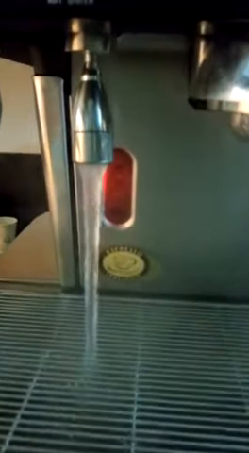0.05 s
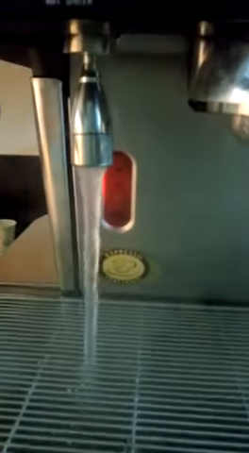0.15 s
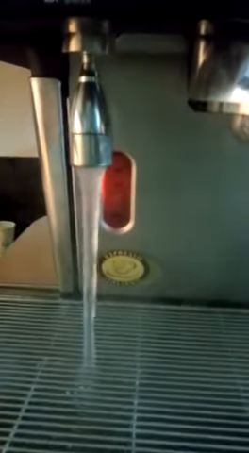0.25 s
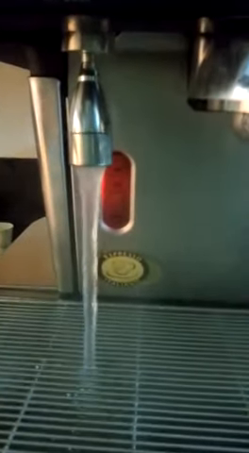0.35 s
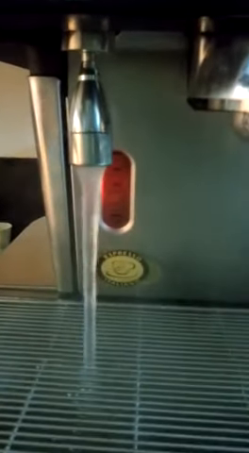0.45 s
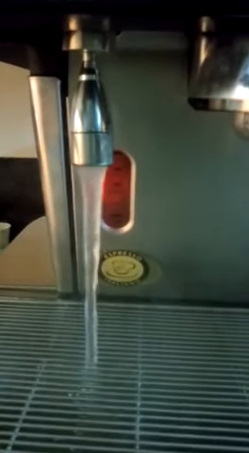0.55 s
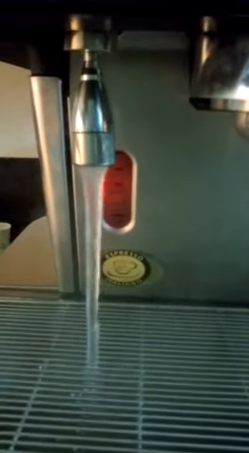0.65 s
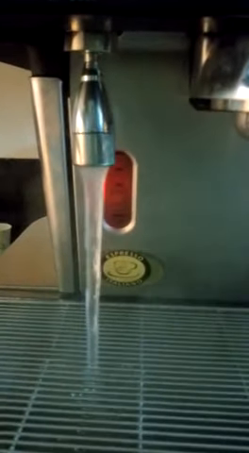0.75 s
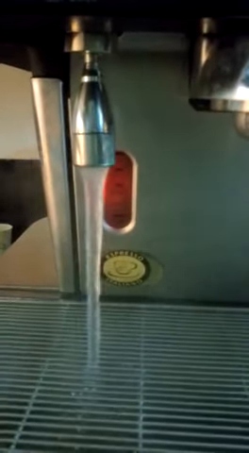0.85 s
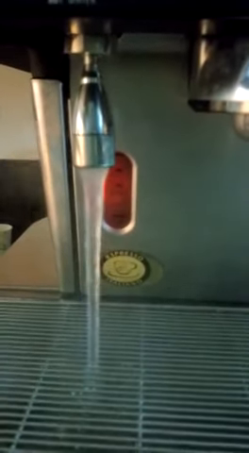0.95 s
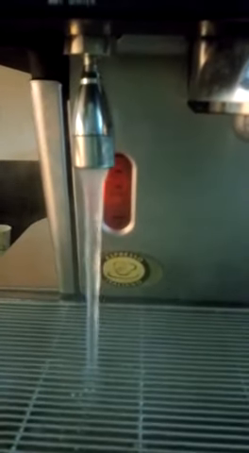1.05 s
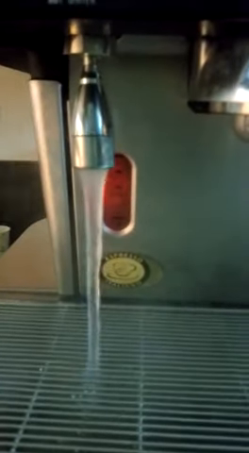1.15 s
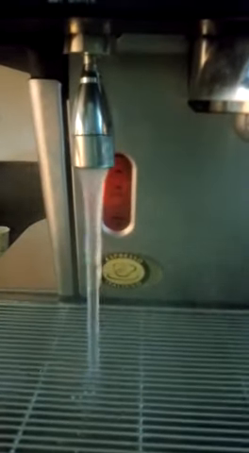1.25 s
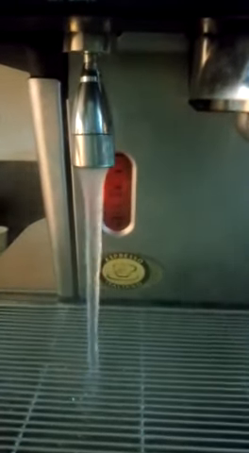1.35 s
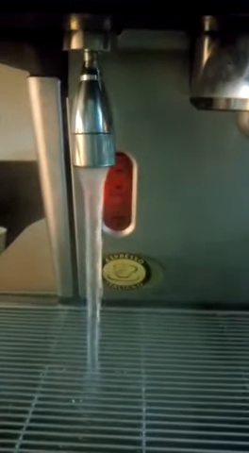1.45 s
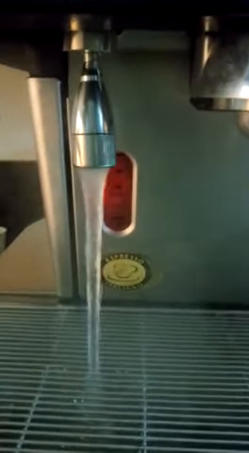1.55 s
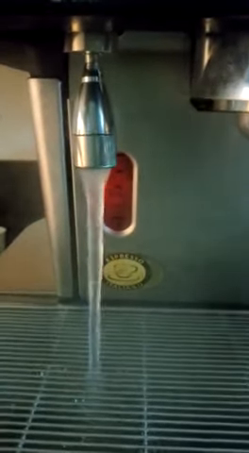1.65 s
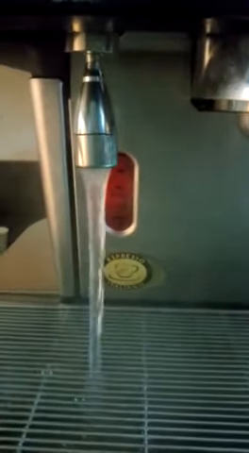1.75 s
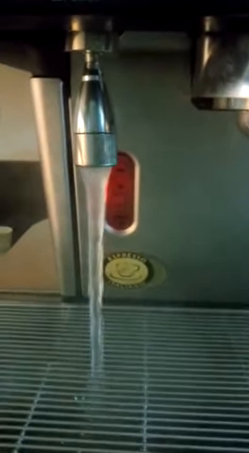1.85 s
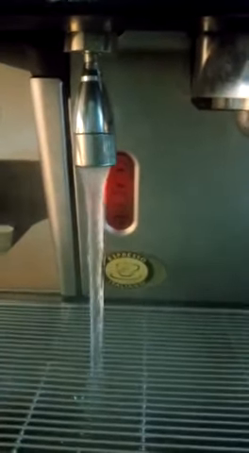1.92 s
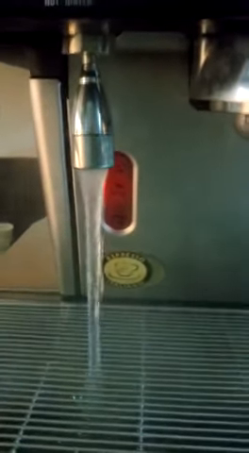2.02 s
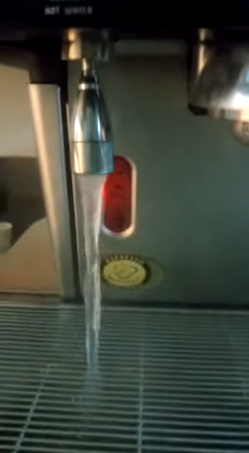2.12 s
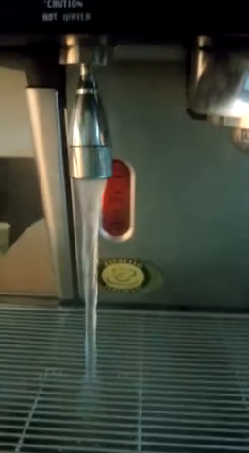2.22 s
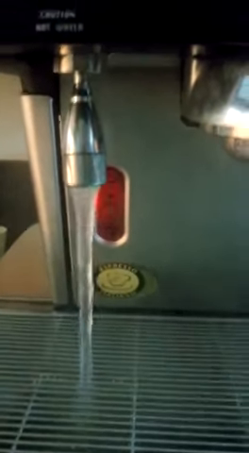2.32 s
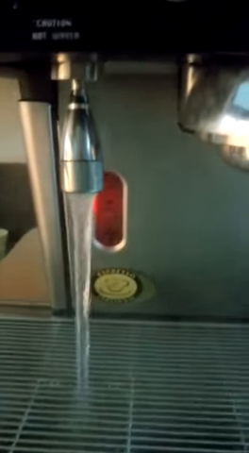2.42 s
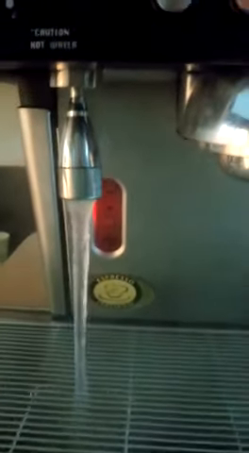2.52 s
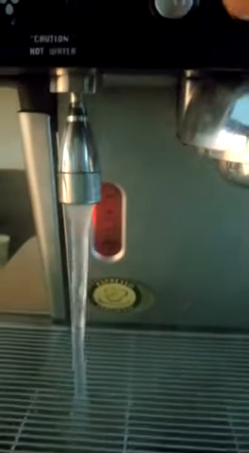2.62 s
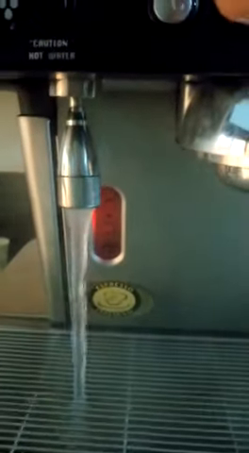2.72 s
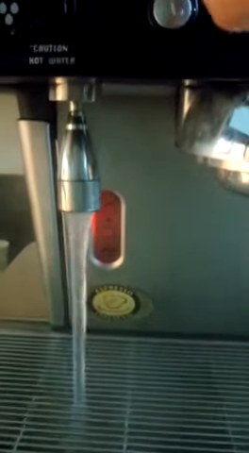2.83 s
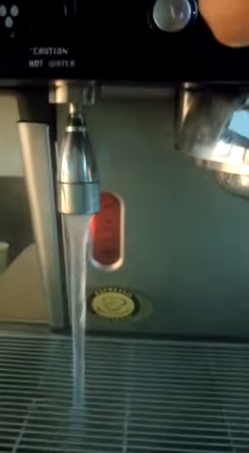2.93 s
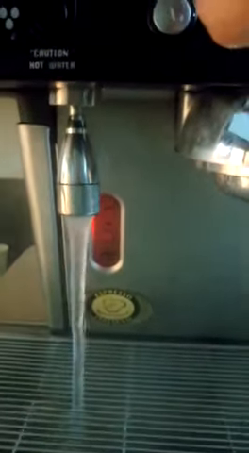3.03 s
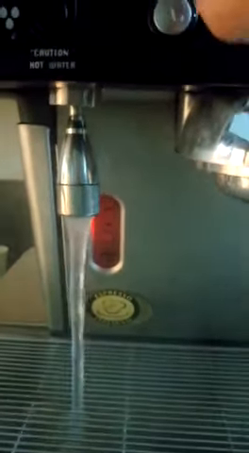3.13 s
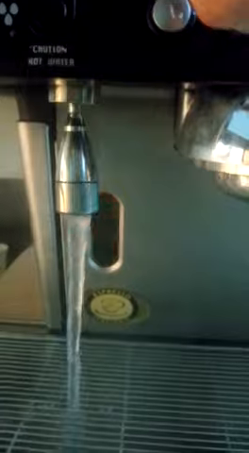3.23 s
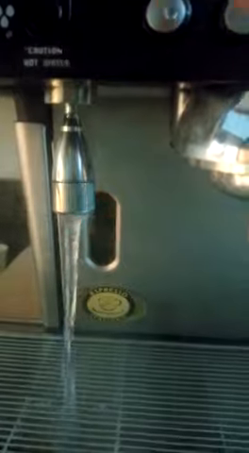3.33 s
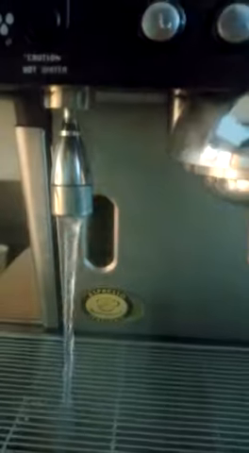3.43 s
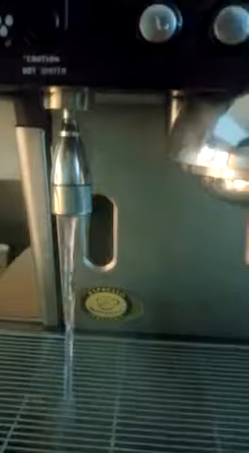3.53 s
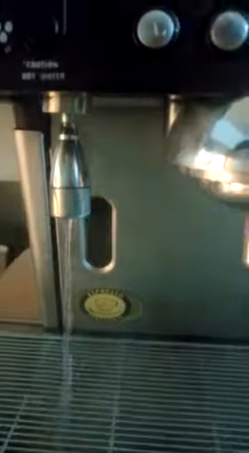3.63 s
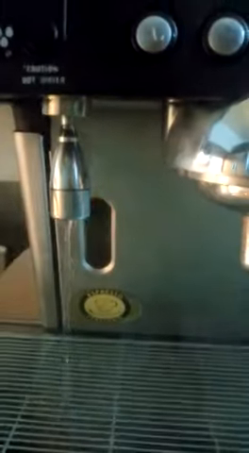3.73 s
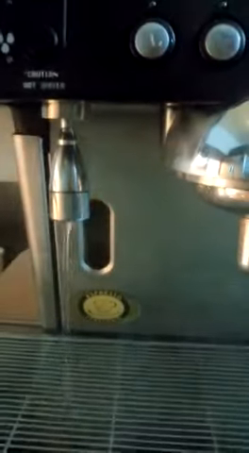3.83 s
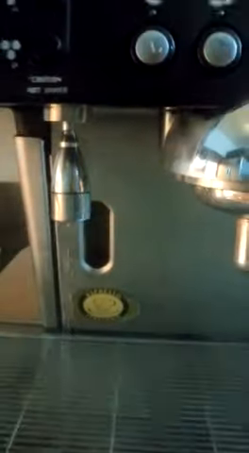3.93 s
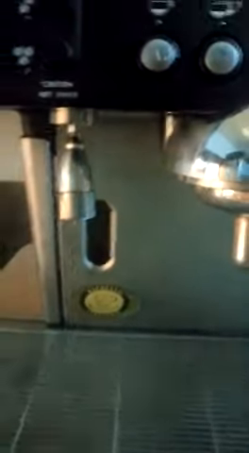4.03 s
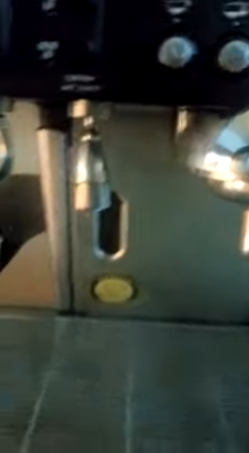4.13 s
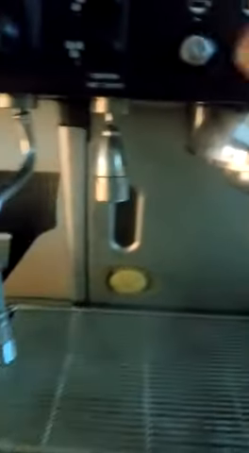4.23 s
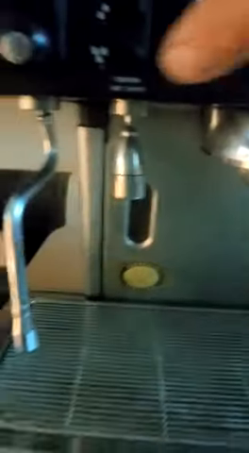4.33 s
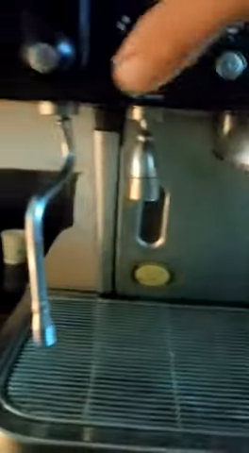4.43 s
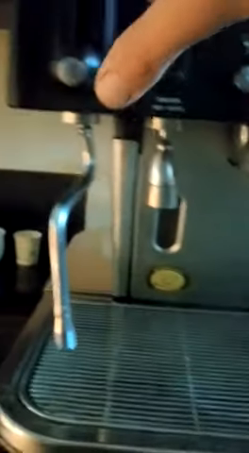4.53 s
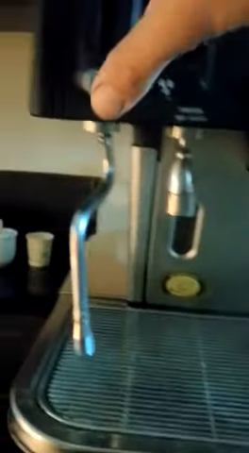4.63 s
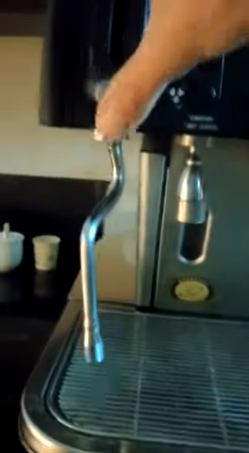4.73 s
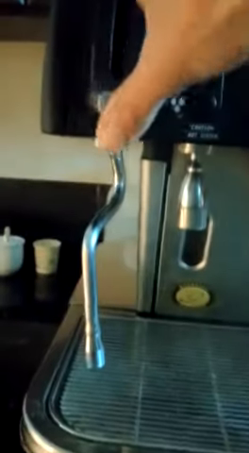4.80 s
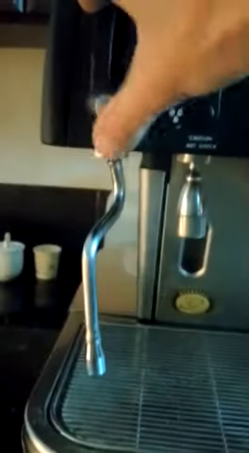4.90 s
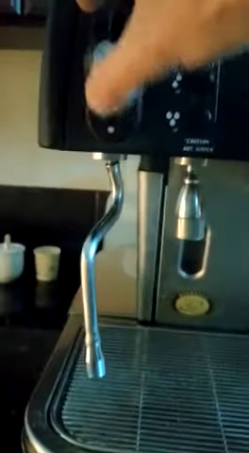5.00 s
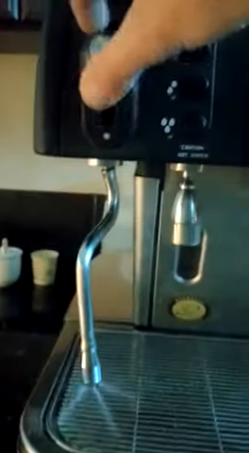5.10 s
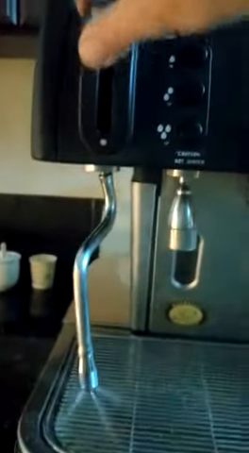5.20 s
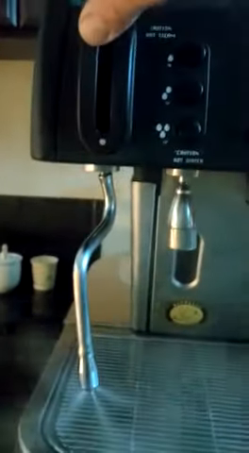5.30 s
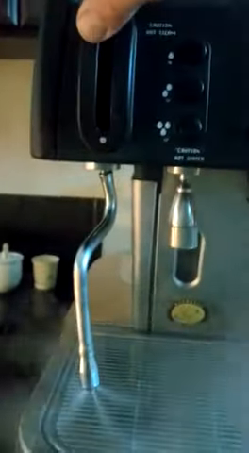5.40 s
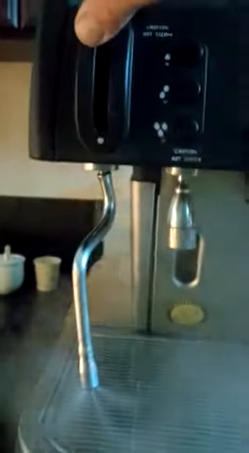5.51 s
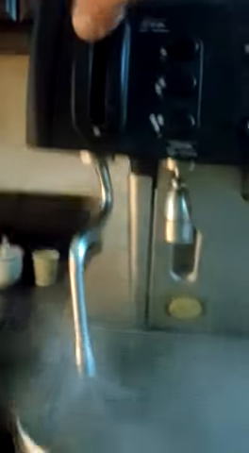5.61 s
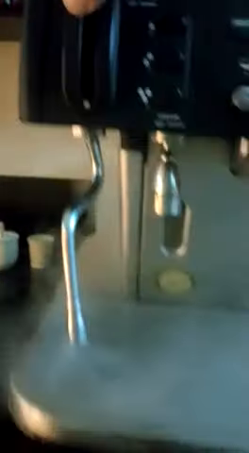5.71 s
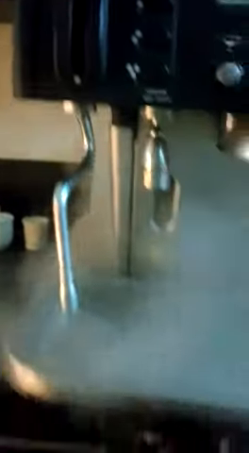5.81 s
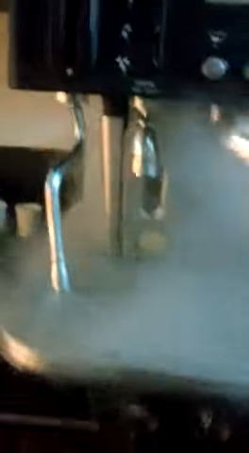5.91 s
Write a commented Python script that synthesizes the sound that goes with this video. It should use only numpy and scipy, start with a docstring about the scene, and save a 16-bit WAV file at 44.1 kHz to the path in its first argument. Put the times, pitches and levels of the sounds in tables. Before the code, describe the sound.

A humming pump and steady hissing pour stop with a pipe thud and gurgle; after a quiet rumble, a steam wand clacks and roars.

```python
"""A kitchen counter with an espresso machine, close to two microphone ports; the right one faces the machine.
The pump hums as harmonics of its turning; hot water, filtered noise and droplets, hisses onto a steel tray.
The valve shuts: damped pipe modes hammer, the flow gurgles away, the last drips fall, a faint regular
ticking fades and the boiler rumbles on. Then the steam valve clacks open; the wand spits condensate and
blows a bright jet of noise onto the tray."""
import sys
import numpy as np
from scipy import signal
from scipy.fft import rfft, irfft, next_fast_len
from scipy.io import wavfile
from scipy.ndimage import uniform_filter1d, map_coordinates

SR = 44100
rng = np.random.default_rng(int(sys.argv[2]) if len(sys.argv) > 2 else 0)


def wrap_up_sound(samples):
    """Save the sound to the file named by the first command line argument, as 16-bit audio."""
    columns = np.atleast_2d(samples).T
    # keep every value between -1 and 1, then stretch to whole-number steps
    tamed = np.clip(columns, -1, 1)
    steps = np.round(tamed * 32767).astype(np.int16)
    wavfile.write(sys.argv[1], SR, steps)


N = 262836

# pouring stream: freq_hz, at_spout_db, drawn_back_db
STREAM_SPECTRUM = [(19.9, -17, -18), (50, -29, -31), (114, -10.5, -9), (250, -0.5, -2), (680, -2.0, -1.5),
                   (1020, -7.0, -8.5), (2120, -3, -2), (3470, -2.5, -4), (4560, 1, 1.5), (5740, 0, -0.5),
                   (6800, -8.5, -8), (9900, -9, -8.5), (15000, -12.5, -11)]
# tray and casing resonances: centre_hz, width_hz, at_spout_db, drawn_back_db
TRAY_MODES = [(190.6, 40, 11, 10), (222, 10, 4.5, 8.5), (311, 32, 7, 4), (454.4, 87, 9, 7), (564, 27, 5, 5),
              (596, 17, 6.5, 3), (800, 45, 3.5, 0.5), (912, 74, 4.5, 7.5), (990, 9.9, 7.5, 7),
              (1357, 24, 2, 6), (1560, 570, 5, 5.5), (1683, 100, 1.5, 3), (2004, 180, 7, 5),
              (2570, 38, 3.5, 3), (2800, 330, 6, 7), (2974, 250, 1.5, 8), (3300, 300, 1, -2.5),
              (3750, 230, 6, 5), (4110, 250, 7.5, -1), (4840, 290, 4, 3), (5020, 400, 0, 2.5),
              (6500, 340, 0.5, 6.5)]
# slack stream after the valve has shut: freq_hz, level_db
TRICKLE_SPECTRUM = [(45, -32), (100, -17), (200, -0.5), (310, -2.5), (430, 1), (750, -5), (1200, -4),
                    (2000, -1.5), (3000, -6.5), (5000, -8), (7000, -16), (15000, -32)]
# steady pour, then draining: time_s, flow_db (relative to the steady pour)
FLOW_CURVE = [(2.8, 0), (3.16, 0.7), (3.24, -2.5), (3.362, -7.5), (3.44, -16), (3.6, -26.5), (4.18, -66)]
HISS_DB, GURGLE_DB = -27.5, -32  # steady pour at the spout, treble and bass
GURGLE_DB_PER_FLOW_DB, GURGLE_BACK_DB = 0.74, 1.5
EMPTY_S, EMPTY_LENGTH_S, EMPTY_DB = 3.6, 0.32, -2.5  # spout runs empty, gurgles less


def hot_water():
    """Water flashes to vapour in the spout and spatters on the tray; losing pressure, it dulls and breaks up."""
    flow_db, = curves(FLOW_CURVE)
    back = drawn_back()
    slack = ramp(3.09, 0.41)
    flow = rng.standard_normal((2, N)) + amp(-7.0) * spatter(rate_hz=3500, spread_db=2)
    unsteady_db = 0.79 * wobble(260) + 1.1 * slack * wobble(70)
    flow = patches(flow * amp(unsteady_db), depth_db=0.77)
    pair = ports(panels(flow, wet_db=-7.5, t60_s=0.17), shade_column=0, lag_ms=0.28)

    near, far = filtered(pair[None], lambda hz: colour(hz, STREAM_SPECTRUM, TRAY_MODES)[:, None])
    pour = unit(near * (1 - back) + far * back)
    trickle = unit(filtered(pair, lambda hz: amp(along(TRICKLE_SPECTRUM, hz))))
    gurgle, hiss = split(pour * (1 - slack) + trickle * slack, edge_hz=960)

    gurgle_db = GURGLE_DB + GURGLE_DB_PER_FLOW_DB * flow_db + GURGLE_BACK_DB * back
    gurgle_db = gurgle_db + EMPTY_DB * ramp(EMPTY_S, EMPTY_LENGTH_S) + 0.2 * wobble(24.8)
    hiss_db = HISS_DB + flow_db + 0.19 * wobble(14.0)
    return amp(gurgle_db) * gurgle + amp(hiss_db) * hiss


# steam jet: freq_hz, level_db
JET_SPECTRUM = [(20, -40), (50, -41), (110, -23), (250, -21.5), (800, -12.5), (2000, -6.5), (4000, -3.5),
                (5500, -2.5), (6400, -1), (7200, -2), (10000, -4.5), (15000, -1)]
# wand and tray resonances: centre_hz, width_hz, level_db
WAND_MODES = [(225, 14, 12.5), (324.5, 16, 9.5), (470, 14, 9.5), (594, 170, 6), (1388, 21, 4),
              (2010, 40, 0), (2800, 450, 4.5), (3170, 80, 2), (4730, 510, 3)]
# rows spit, jet, top hiss: open_wet_db, barely_open_change_db, dry_change_db
STEAM_LEVELS = [(-34.5, -6.5, -8), (-31, -7.5, -2), (-22.5, -11, 2.1)]
# sputters that make the wand sing: centre_s, level_db (before pan), pitch_hz, width_hz, length_s
WAND_SPUTTERS = [(5.128, -44, 1990, 130, 0.02), (5.125, -40, 1400, 370, .02), (5.12, -39, 2900, 500, 0.019),
                 (3.1, -41, 230, 170, 0.025), (5.27, -52, 280, 200, 0.05), (5.33, -33, 1390, 91, 0.014)]
# nozzle whistle, sagging and swelling: time_s, pitch_hz, level_db (before pan)
NOZZLE_WHISTLE = [(5.15, 6500, -50), (5.22, 6416, -38), (5.26, 6300, -29), (5.29, 6180, -35),
                  (5.33, 6420, -32), (5.43, 6370, -39), (5.5, 6130, -28), (5.56, 6360, -40),
                  (5.68, 6280, -36), (5.77, 6400, -33.5), (5.84, 6140, -27), (5.93, 6420, -46)]
STEAM_S = 5.0747  # valve cracks open
OPEN_S, OPEN_LENGTH_S = 5.155, 0.13
DRY_S, DRY_LENGTH_S = 5.317, 0.33
COUGH_S, COUGH_LENGTH_S, COUGH_DB = 5.132, 0.015, 4  # first slug of condensate


def steam():
    """The wand first spits condensate; as it clears, the jet turns dry, smooth and bright."""
    opening, dryness = ramp(OPEN_S, OPEN_LENGTH_S), ramp(DRY_S, DRY_LENGTH_S)
    wetness = 1 - dryness
    flutter_db = 0.3 * wobble(22)
    spit_db, jet_db, top_db = [open_db + shut_db * (1 - opening) + dry_db * dryness + flutter_db
                               for open_db, shut_db, dry_db in STEAM_LEVELS]
    spit_db = spit_db + COUGH_DB * swell(COUGH_S, COUGH_LENGTH_S)

    flow = rng.standard_normal((2, N)) * amp(0.81 * wetness * wobble(220))
    flow = flow + amp(-9.5) * wetness * spatter(rate_hz=1100, spread_db=1)
    flow = patches(flow, depth_db=1.5)
    pair = ports(panels(flow, wet_db=-8.0, t60_s=0.15), shade_column=1, lag_ms=0.1)
    pair = filtered(pair, lambda hz: colour(hz, JET_SPECTRUM, WAND_MODES))
    spit, rest = split(pair, edge_hz=1780)
    jet, top = split(rest, edge_hz=4700)
    blast = amp(spit_db) * spit + amp(jet_db) * jet + amp(top_db) * top

    nozzle_hz, nozzle_db = curves(NOZZLE_WHISTLE)
    whistle = amp(nozzle_db) * murmur(nozzle_hz, width_hz=460) * amp([[-16], [4]])
    sputters = puffs(WAND_SPUTTERS) * amp([[-7], [3]])
    return ramp(STEAM_S, 0.026) * (blast + sputters + whistle)


PUMP_HZ = 98.5
PUMP_DB, PUMP_BACK_DB = -37.5, -1.7  # at the spout before pan; change when drawn back
PUMP_OFF_S, PUMP_FALL_DB_PER_S = 3.2, 300


def pump():
    """The pump turns at a nearly steady speed and shakes the casing until it is switched off."""
    turn = 2 * np.pi * PUMP_HZ * clock() + 0.095 * wobble(8.6)
    hum = np.sin(turn) + amp(-7.5) * np.sin(2 * turn + wobble(10))
    fall_db = PUMP_FALL_DB_PER_S * np.maximum(clock() - PUMP_OFF_S, 0)
    level_db = PUMP_DB + PUMP_BACK_DB * drawn_back() - fall_db + 0.86 * wobble(11.97)
    return amp(level_db) * unit(hum) * amp([[-1.5], [1.3]])


# plunger and seat: pitch_hz, relative_db, t60_s
CLACK_MODES = [(235, -14, .06), (3160, -18, .05), (4960, -11, 0.038), (5280, -1, .025), (5660, -12, .015),
               (6700, -17, .04), (12010, -8, .04), (15600, -4, .025)]


def steam_valve():
    """The valve's plunger clacks open against its steel seat, with a bright snap of released pressure."""
    noise = crack(STEAM_S, t60_s=0.051)
    snap = amp(7.5) * band(noise, centre_hz=5370, width_hz=750)
    snap = snap + amp(-1) * band(noise, centre_hz=7540, width_hz=2200)
    snap = snap + amp(4) * band(noise, centre_hz=12300, width_hz=3700)
    attack = ramp(STEAM_S, 0.0004)
    clack = panels((strike(STEAM_S, CLACK_MODES) + snap) * attack, wet_db=-13, t60_s=0.07)
    return amp(-19.0) * clack * amp([[-11], [2]])


# water column hammering the shut valve: start_s, level_db (before pan)
HAMMER_BLOWS = [(3.2055, -19), (3.2132, -14.5), (3.258, -25.5), (3.329, -34), (3.371, -30)]
# pipe rung by each blow: pitch_hz, relative_db, t60_s
PIPE_MODES = [(324, -9, .05), (480, -6, 0.045), (736, -5.5, 0.092), (990, -21, .06)]
# pipe singing and gulping as the valve narrows: centre_s, level_db (before pan), pitch_hz, width_hz, length_s
PIPE_SINGING = [(3.19, -34, 742, 25, .025), (3.261, -38, 742, 20, 0.02), (3.275, -36, 310, 64, 0.023),
                (3.355, -39, 317, 44, .035)]
# slackening stream in spurts: start_s, relative_db, centre_hz
STREAM_SPURTS = [(3.204, -13, 5200), (3.249, -14, 3000), (3.272, -22, 4800), (3.293, -11, 3000),
                 (3.336, -16.5, 5000), (3.356, -12, 4500), (3.371, -20, 3000)]


def shut_off():
    """The water valve shuts: the pipe sings, hammers a few times and gives its last spurts."""
    # each blow also pushes: a 0.6 ms pulse
    knocks = sum(amp(db) * (strike(s, PIPE_MODES) - swell(s, 0.0006)) for s, db in HAMMER_BLOWS)
    # a thin pipe radiates no deep bass
    knocks = filtered(knocks, lambda hz: (1j * hz / (90 + 1j * hz)) ** 2)
    spurts = sum(amp(db) * band(crack(s, t60_s=0.019), hz, width_hz=960) for s, db, hz in STREAM_SPURTS)
    dying = knocks + puffs(PIPE_SINGING) + spurts
    return panels(dying, wet_db=-14, t60_s=0.073) * amp([[-7], [2]])


# last drips on the tray: start_s, level_db (before pan), pitch_hz
LAST_DRIPS = [(3.523, -40, 850), (3.549, -41, 700), (3.598, -49, 1100), (3.608, -46, 653),
              (3.632, -53, 1400), (3.642, -44, 1910), (3.675, -40, 1500)]
# faint regular ticks: start_s, level_db (before pan)
TICK_TIMES = [(3.666, -40), (3.6995, -39), (3.732, -43), (3.765, -44), (3.7985, -44), (3.8318, -44),
              (3.865, -50), (3.8985, -45), (3.932, -46), (3.965, -48)]
# hollow sound of each tick: pitch_hz, relative_db, t60_s
HOLLOW_MODES = [(766, -0.5, 0.014), (1170, -8, 0.012), (1750, -10, .014)]


def drips_and_ticking():
    """The last drips hit the tray as damped sines and noise; a faint regular ticking of damped modes fades."""
    drips = 0
    for s, db, hz in LAST_DRIPS:
        splash = 0.5 * band(crack(s, t60_s=0.012), hz, width_hz=1500)
        drips = drips + amp(db) * (ring(s, hz, t60_s=0.011) + splash)
    ticks = sum(amp(db) * strike(s, HOLLOW_MODES) for s, db in TICK_TIMES)
    return panels(drips + ticks, wet_db=-4, t60_s=0.077) * amp([[-6], [2]])


# rustles: centre_s, level_db (before pan), centre_hz, width_hz, length_s
RUSTLE_PUFFS = [(3.97, -71, 6300, 500, .04), (4.27, -71, 4100, 400, .05), (4.4, -70, 4400, 450, .09),
                (4.43, -72, 3000, 600, 0.087), (4.62, -74, 4200, 600, 0.046), (4.64, -73, 1790, 600, .08)]


def handling():
    """Soft rustles of narrow noise as the microphone is carried to the steam wand."""
    return puffs(RUSTLE_PUFFS) * amp([[-9], [3]])


# boiler: freq_hz, level_db
BOILER_SPECTRUM = [(20, -26), (50, -12.5), (95, -4), (260, 2.5), (550, -17), (1100, -21.5), (2400, -34),
                   (4200, -33.5), (6000, -36), (7500, -43), (15000, -34)]
# boiler resonances: centre_hz, width_hz, level_db
BOILER_HUMPS = [(307, 22, 2), (454, 47, 5.0), (1900, 540, 11), (2756, 68, 9), (4130, 670, 8)]
RUMBLE_DB, SEETHE_DB, FIZZ_DB = -48, -69.5, -66  # before the steam runs
DRONE_DB, DRONE_ON_S, DRONE_EBB_S, DRONE_FADE_S = -54, 4.06, 4.9, 0.11


def boiler():
    """The hot boiler rumbles, simmers and hums faintly; it sinks 9 dB once the steam runs."""
    noise = panels(rng.standard_normal((2, N)), wet_db=-8, t60_s=0.11)
    pair = patches(ports(noise, shade_column=2, lag_ms=0.28), depth_db=1.45)
    pair = filtered(pair, lambda hz: colour(hz, BOILER_SPECTRUM, BOILER_HUMPS))
    rumble, simmer = split(pair, edge_hz=790)
    seethe, fizz = split(simmer, edge_hz=2300)
    rumble = amp(RUMBLE_DB + 0.5 * wobble(10)) * rumble
    seethe = amp(SEETHE_DB + 1.8 * wobble(12.0)) * seethe
    fizz = amp(FIZZ_DB + 1.5 * wobble(7.6)) * fizz

    running = ramp(DRONE_ON_S, DRONE_FADE_S) * amp(-6 * ramp(DRONE_EBB_S, DRONE_FADE_S))
    hum = np.sin(2 * np.pi * PUMP_HZ * clock() + 0.4 * wobble(8))
    drone = amp(DRONE_DB) * running * unit(hum)
    return amp(-9 * ramp(5.26, 0.14)) * (rumble + seethe + fizz + drone)


# microphone position: time_s, drawn_back_share (0-1)
MIC_POSITION = [(1.9, 0.09), (2.4, 0.83)]


def drawn_back():
    """How far the microphone has left the spout, 0-1."""
    return np.clip(curves(MIC_POSITION)[0], 0, 1)


# left port in the microphone body's shadow: freq_hz, water_db, steam_db, boiler_db
LEFT_SHADE = [(90.3, 6.5, 1.5, 1), (200, -2, -1.5, -1), (450, -8, -5.5, -6.5), (1000, -9.5, -12.5, -9),
              (1990, -14, -11, -14), (4200, -16.5, -20.5, -15), (6200, -20.5, -19, -7),
              (10700, -23.5, -20, -1.5), (15000, -17.5, -16, -12)]
# likeness of the two ports: freq_hz, likeness (0-1)
PORT_LIKENESS = [(100, 0.89), (350, 0.7), (700, 0.65), (1500, 0.65), (5000, 0.18), (9000, 0.23)]


def ports(flows, shade_column, lag_ms):
    """The right port hears the first flow; the left hears it later, mixed with the second and shaded."""
    direct, scattered = flows

    def alike(hz):
        return np.clip(along(PORT_LIKENESS, hz)[0], 0, 1)

    left = filtered(direct, lambda hz: alike(hz) * np.exp(-2j * np.pi * hz * lag_ms / 1000))
    left = left + filtered(scattered, lambda hz: np.sqrt(1 - alike(hz) ** 2))
    left = filtered(left, lambda hz: amp(along(LEFT_SHADE, hz)[shade_column]))
    return np.array([left, direct])


def panels(x, wet_db, t60_s):
    """Steel panels, too small to return bass, echo in a short cluster that shifts as the microphone sways."""
    t = np.arange(SR // 4) / SR
    tails = rng.standard_normal((2, 1, len(t))) * amp(-60 * t / t60_s) * (t > 0.001)
    first, second = [signal.fftconvolve(np.atleast_2d(x), tail / np.linalg.norm(tail), axes=1)[:, :N]
                     for tail in tails]
    sway_rad = 1.62 * clock()
    echoes = first * np.cos(sway_rad) + second * np.sin(sway_rad)
    return x + amp(wet_db) * filtered(echoes, lambda hz: hz ** 2 / (hz ** 2 + 700 ** 2))


def patches(x, depth_db):
    """Turbulence makes the colour wander: a smooth random gain over time and frequency."""
    z = signal.stft(x, nperseg=512)[2]
    field = rng.standard_normal(z.shape[1:])
    field = uniform_filter1d(field, size=6, axis=0)
    field = uniform_filter1d(field, size=16, axis=1)
    return signal.istft(z * amp(depth_db * unit(field)), nperseg=512)[1][:, :N]


def spatter(rate_hz, spread_db):
    """Two streams of random droplet impacts of uneven size, rms 1."""
    hit = rng.random((2, N)) < rate_hz / SR
    size = amp(spread_db * rng.uniform(-1.7, 1, (2, N)))
    return unit(hit * rng.choice([-1, 1], (2, N)) * size)


def strike(start_s, modes):
    """All the modes of an object, struck at start_s."""
    return sum(amp(db) * ring(start_s, hz, t60_s) for hz, db, t60_s in modes)


def ring(start_s, hz, t60_s):
    """A damped sine that begins at start_s."""
    t = np.maximum(clock() - start_s, 0)
    return np.sin(2 * np.pi * hz * t) * amp(-60 * t / t60_s)


def crack(start_s, t60_s):
    """A burst of noise that begins at start_s and dies away."""
    age = clock() - start_s
    return rng.standard_normal(N) * amp(-60 * np.abs(age) / t60_s) * (age > 0)


def puffs(rows):
    """Short swells of narrow noise."""
    return sum(amp(db) * swell(s, length_s) * murmur(hz, width_hz) for s, db, hz, width_hz, length_s in rows)


def murmur(centre_hz, width_hz):
    """Narrow noise of rms 1 around a centre that may move."""
    a, b = filtered(rng.standard_normal((2, N)), lambda hz: 1 / (1 + (2 * hz / width_hz) ** 2))
    turn = 2 * np.pi * np.cumsum(centre_hz * np.ones(N)) / SR
    return unit(a * np.cos(turn) + b * np.sin(turn))


def band(x, centre_hz, width_hz):
    """x through one resonance."""
    return filtered(x, lambda hz: 1j * hz * width_hz / (centre_hz ** 2 - hz ** 2 + 1j * hz * width_hz))


def split(x, edge_hz):
    """The parts of a pair below and above an edge, each scaled so the mean of its ports has rms 1."""
    low = filtered(x, lambda hz: 1 / (1 + (hz / edge_hz) ** 8))
    return [part / np.std(part.mean(0)) for part in (low, x - low)]


def colour(hz, spectrum, modes):
    """Gain of a broad spectrum with resonant humps on it, one row per dB column."""
    humps = sum(np.outer(db, 1 / (1 + (2 * (hz - centre_hz) / width_hz) ** 2))
                for centre_hz, width_hz, *db in modes)
    return amp(along(spectrum, hz) + humps)


def filtered(x, response):
    """x times a response of frequency."""
    size = next_fast_len(N + SR // 2)
    return irfft(rfft(x, size) * response(np.fft.rfftfreq(size, 1 / SR)), size)[..., :N]


def along(points, hz):
    """Each column of a table over frequency, read on a log axis."""
    f, *cols = np.transpose(points)
    return np.array([np.interp(np.log(hz + 1), np.log(f), c) for c in cols])


def curves(rows):
    """One value per sample for each column after the time."""
    s, *cols = np.transpose(rows)
    return [np.interp(clock(), s, c) for c in cols]


def wobble(rate_hz):
    """A smooth random curve through rate_hz knots a second."""
    return map_coordinates(rng.standard_normal(int(N * rate_hz / SR) + 4), [clock() * rate_hz])


def ramp(start_s, length_s):
    """Goes from 0 to 1, beginning at start_s."""
    return np.clip((clock() - start_s) / length_s, 0, 1)


def swell(centre_s, length_s):
    """Rises to 1 at centre_s and falls again."""
    return np.exp(-((clock() - centre_s) / length_s) ** 2)


def clock():
    """The time of every sample, in seconds."""
    return np.arange(N) / SR


def unit(x):
    """Scaled to rms 1."""
    return x / np.sqrt(np.mean(x ** 2) + 1e-20)


def amp(db):
    """Decibels to gain."""
    return 10 ** (np.asarray(db) / 20)


def scene():
    """Everything the machine does, the ticking, and the rustles on the way to the wand."""
    water = hot_water() + pump() + shut_off() + drips_and_ticking()
    return water + steam() + steam_valve() + handling() + boiler()


# microphone colour: freq_hz, gain_db
MIC_RESPONSE = [(5800, 1), (6600, -0.5), (7600, -10.5), (13800, -13), (14900, 2), (15600, -0.5)]
TOP_HZ = 15850  # middle of the 500 Hz wide cutoff


def record(dry):
    """The microphone dips above 7 kHz and peaks again just under its band limit."""
    def response(hz):
        limit = np.clip((TOP_HZ + 250 - hz) / 500, 0, 1) ** 2
        return amp(along(MIC_RESPONSE, hz)) * limit

    return filtered(dry, response)


dry = scene()
out = record(dry)
wrap_up_sound(out)
```